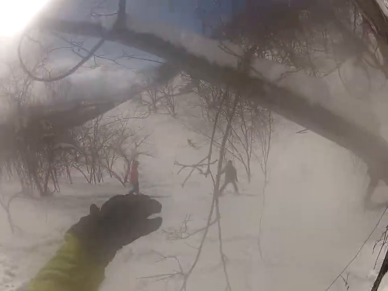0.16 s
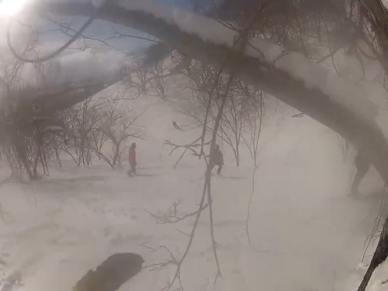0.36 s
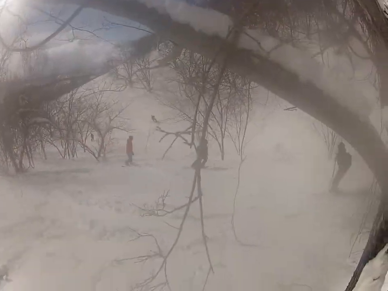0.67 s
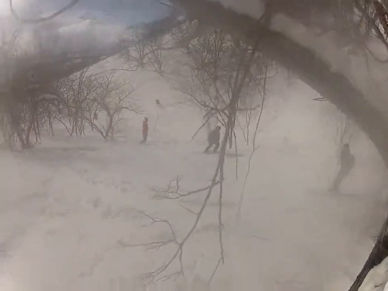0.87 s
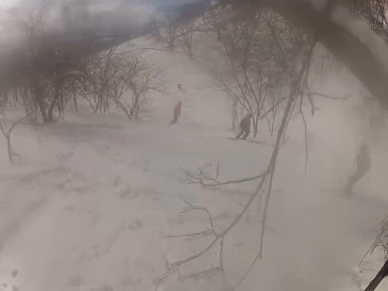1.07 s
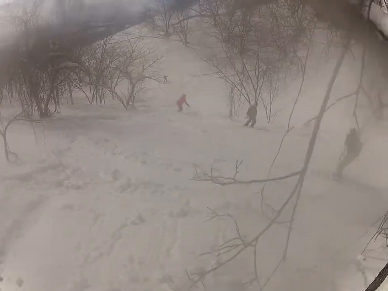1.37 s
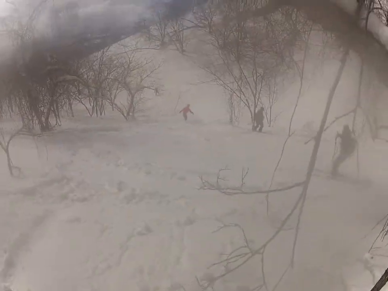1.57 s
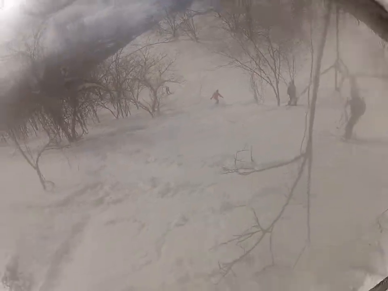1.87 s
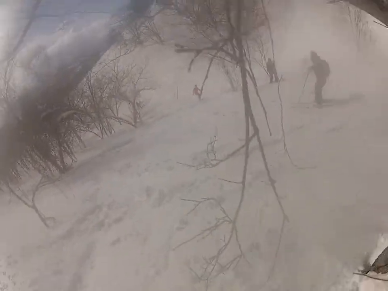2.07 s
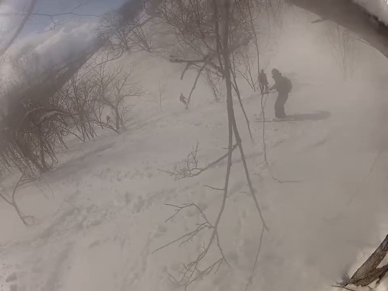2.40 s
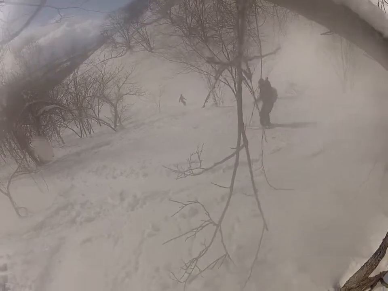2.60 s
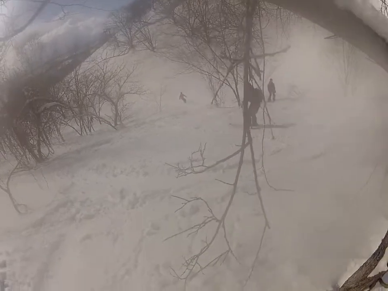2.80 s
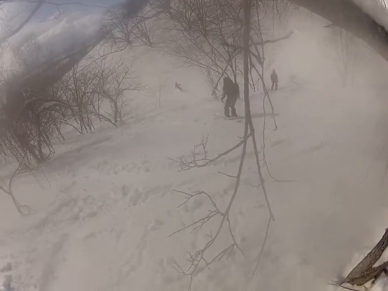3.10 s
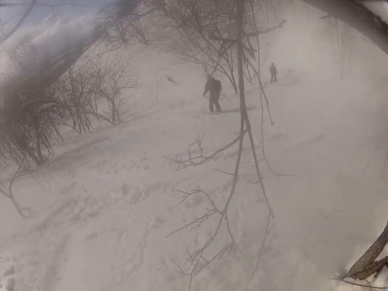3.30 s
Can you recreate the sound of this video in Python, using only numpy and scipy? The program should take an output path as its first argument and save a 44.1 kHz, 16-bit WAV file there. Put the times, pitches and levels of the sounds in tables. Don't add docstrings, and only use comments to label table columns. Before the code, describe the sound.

Sleeve and twigs scrape and knock a camera's plastic case: faint brushes and taps over low wind first, then loud rubbing and clacks after two seconds, heard from inside the closed case on a snowy slope.

```python
import sys
import numpy as np
from scipy import signal
from scipy.fft import rfft, irfft, next_fast_len
from scipy.io import wavfile
from scipy.ndimage import uniform_filter1d

SR = 44100
rng = np.random.default_rng(int(sys.argv[2]) if len(sys.argv) > 2 else 0)


def master(y):
    cut = np.clip(np.atleast_2d(y).T, -1, 1)
    pcm = np.round(cut * 32767)
    wavfile.write(sys.argv[1], SR, pcm.astype(np.int16))


def to_linear_factor(level_db):
    exponent = np.asarray(level_db, float) / 20
    return 10 ** exponent


N = 152145

# f/Hz, density/dB
AIR_SPECTRUM = [(15, -33), (25, 3), (58, -1), (92, -15), (186, -5.5), (239, -9.5), (916, -27.5),
                (2230, -26), (5800, -33), (7540, -75), (12800, -120)]
# centre t/s, peak level/dB, f/Hz, length/cycles
MOUNT_THUMPS = [(.032, -39.5, 70, 0.61), (0.167, -45, 43.7, 1.6), (0.221, -42, 50.4, 2.3),
                (.818, -27.5, 52, 2), (1.385, -43.5, 44, 1.9), (1.81, -49, 59, 0.65),
                (1.849, -41.5, 120, 0.54), (2.03, -46.5, 47, 2.4), (2.159, -18, 184, 2.06),
                (2.17, -20.5, 51.5, 1.5), (2.185, -23.5, 337, 3.1), (2.304, -4, 324, 0.61),
                (2.318, -18, 160, 2.24), (2.372, -16.5, 70, 0.75), (2.485, -18.5, 59.4, 1.97),
                (2.564, -19, 61, 1.67), (2.641, -21, 231, 0.54), (3.02, -32, 182, 1.7),
                (3.037, -3, 140, 0.66), (3.118, -13.5, 162, 0.7), (3.174, -18, 205, 0.6),
                (3.187, -25, 59.6, 1.3), (3.399, -36.5, 31.8, 1.8)]
# f/Hz, width/Hz, level/dB
MOUNT_MODES = [(51, 45, -6.5), (120, 27.7, -4.5), (237, 120, -8)]
# f/Hz, width/Hz, level/dB
CASE_MODES = [(456, 123, -10), (1074.5, 149, 1), (1470, 250, -4), (1812, 226, 1), (2300, 257, 2),
              (2593, 420, -3), (3305, 183, 0), (3580, 170, -8), (4300, 930, -13), (5096, 490, -7.5),
              (5093, 520, -18)]
# t/s, peak level/dB, struck spot f/Hz, contact length/s, spread/Hz
LIGHT_TAPS = [(.009, -38.5, 2000, 0.0024, 500), (.055, -37.5, 2070, .005, 900),
              (.079, -31.5, 1190, 0.0043, 880), (.173, -38, 1500, .002, 4000),
              (.190, -43, 4240, 0.0023, 3000), (.205, -44, 4500, 0.0027, 2500),
              (.217, -43, 2980, 0.0036, 4000), (.424, -43.5, 1040, .004, 400),
              (.425, -39, 4300, 0.002, 2490), (.443, -47, 1040, 0.0044, 300),
              (.4623, -30.5, 2300, 0.0016, 2960), (1.06, -51.5, 3540, 0.0023, 600),
              (1.10, -50.5, 1100, 0.0022, 500), (1.237, -41.5, 3100, 0.0027, 2500),
              (1.635, -52, 1100, 0.0033, 500), (1.668, -50, 2400, 0.0044, 1800),
              (2.061, -41.5, 2200, 0.0028, 1500), (2.073, -43, 2500, .003, 4000),
              (2.096, -30.5, 4080, 0.0028, 5000), (2.133, -46.5, 3000, 0.0044, 4000),
              (2.846, -34, 3820, .0015, 2500), (3.313, -28.5, 2400, 0.0018, 2010),
              (3.345, -32, 2200, 0.0028, 1500), (3.375, -32, 2980, 0.0022, 2500)]
# t/s, peak level/dB, struck spot f/Hz, contact length/s, spread/Hz
HARD_KNOCKS = [(2.171, -7, 2300, 0.0036, 1190), (2.181, 0, 1420, 0.0037, 2000),
               (2.202, -8.5, 2300, 0.0029, 900), (2.2365, -5.5, 2120, 0.0041, 1970),
               (2.302, -4.5, 2300, 0.0025, 1470), (2.316, -7, 2090, 0.0028, 2000),
               (2.331, -5.5, 1180, 0.0045, 1510), (2.363, -4.5, 1800, 0.0034, 1500),
               (2.427, -2, 2400, .005, 1500), (2.441, -15, 3200, .002, 2500),
               (2.571, -17.5, 1970, 0.0028, 1500), (2.6, -13.5, 3050, .002, 3000),
               (2.640, -6.5, 2560, 0.0021, 3470), (2.673, -23.5, 2000, .006, 2000),
               (2.883, -10.5, 2230, 0.0025, 2490), (3.033, 3.5, 1156, 0.0035, 905),
               (3.034, 2.5, 3690, 0.0026, 1200), (3.274, -20.5, 1100, 0.0038, 1500),
               (3.283, -14, 1560, 0.0021, 3000)]
# start t/s, length/s, rub level/dB,
# relative mount shake/dB, brightness/dB
RUB_STROKES = [
    (-.05, 0.2, -54.5, 4, -11.5),
    (0.122, 0.15, -53.5, -0.5, -4),
    (0.23, 0.22, -64, 5, -2.5),
    (0.401, 0.057, -56, -18, -4.5),
    (2.001, 0.065, -55, -13, -5),
    (2.089, 0.032, -54, -20, 10),
    (2.041, 0.14, -55.5, 0, 1.5),
    (2.597, 0.79, -50, 8.5, 6.5),
               (2.143, 0.055, -18.5, -9.5, 3.5), (2.184, .035, -24.5, -5, 3),
                (2.217, 0.061, -53.5, 13, 18), (2.243, 0.13, -29.5, -0.5, 5), (2.295, 0.052, -20.5, 3, 5),
                (2.34, 0.028, -18.5, -17, -1), (2.362, 0.11, -33.5, 9, 14), (2.399, 0.072, -18, -7.5, 3.5),
                (2.449, 0.055, -26, 2, 6), (2.489, 0.092, -39, -4, 3.5), (2.529, 0.071, -27, -7, 4),
                (2.582, 0.11, -37.5, -2.5, 4), (2.64, 0.31, -53.5, -12, 5), (2.809, .16, -39, 9, 3),
                (2.968, 0.09, -39.5, 2, 3), (3.033, 0.075, -49, 10, -13), (3.103, 0.063, -32.5, 10.5, -3),
                (3.166, 0.023, -28, 7, -1.5), (3.19, 0.023, -31, 5, -3), (3.202, 0.16, -45, 6.5, 0.5),
                (3.302, 0.19, -61.5, 6, 6.5)]

AIR_DB = -58
CAVITY_HZ, CAVITY_WIDTH_HZ, CAVITY_DB = 1070, 110, -25.5
PUSH_RISE = 0.2
RING_SAMPLES = 2048
KNOCK_DB = -1
STROKE_ATTACK, STROKE_RELEASE = 0.23, 0.31
GRAINS_PER_S, GRAIN_SPREAD_DB = 7000, 2.0
SLIP_PER_S, SLIP_DB = 150, 1.8
JOLTS_PER_S, JOLT_DB = 40, 4.6
TREBLE_HZ = 2940
FULL_SCALE = 1.0
LIMIT_HZ, HOLD_HZ, TOP_HZ = 5900, 12000, 15450


def unit(x):
    return x / np.sqrt(np.mean(x ** 2))


def band(x, hz, width):
    b, a = signal.iirpeak(hz, hz / width, fs=SR)
    return signal.lfilter(b, a, x)


def body(x, modes):
    ringing = 0
    for k, (hz, width, db) in enumerate(modes):
        ringing = ringing + (-1) ** k * to_linear_factor(db) * band(x, hz, width)
    return ringing


def walk(rate):
    hold = int(SR / rate)
    levels = rng.standard_normal(N // hold + 1)
    x = np.repeat(levels, hold)
    x = uniform_filter1d(uniform_filter1d(x, hold), hold)[:N]
    return x / np.std(x)


def tilt(x, db):
    low = signal.sosfilt(signal.butter(2, TREBLE_HZ, fs=SR, output="sos"), x)
    return low + to_linear_factor(db) * (x - low)


def air():
    noise, gust = 0, walk(2.9)
    spectrum_hz, spectrum_db = np.array(AIR_SPECTRUM).T
    for hz in 28 * 2 ** np.arange(0, 7.8, 0.5):
        windy = 1 / (1 + hz / 320)
        db = np.interp(np.log(hz), np.log(spectrum_hz), spectrum_db)
        db = db + windy * (0.5 * gust + 3.6 * walk(13.4))
        source = rng.standard_normal(N)
        noise = noise + to_linear_factor(db) * band(band(source, hz, hz / 2), hz, hz / 2)
    cavity = unit(band(noise, CAVITY_HZ, CAVITY_WIDTH_HZ))
    return (unit(noise) + to_linear_factor(CAVITY_DB) * cavity) * to_linear_factor(AIR_DB)


def thumps(t):
    out = np.zeros(N)
    for s, db, hz, cycles in MOUNT_THUMPS:
        swell = np.exp(-(2 * hz * (t - s) / cycles) ** 2)
        out += to_linear_factor(db) * np.cos(2 * np.pi * hz * (t - s)) * swell
    return out


def hits(contacts, gain_db):
    out = np.zeros(N)
    t = np.arange(RING_SAMPLES) / SR
    for s, db, hz, length, spread in contacts:
        u = t / length
        push = rng.standard_normal(RING_SAMPLES) * np.minimum(u / PUSH_RISE, 1) * np.exp(-u ** 2)
        local = band(band(push, hz, 1.5 * spread), hz, 1.5 * spread)
        ring = body(local, CASE_MODES)
        i = int(s * SR)
        out[i:i + RING_SAMPLES] += ring * to_linear_factor(db + gain_db) / np.abs(ring).max()
    return out


def stick_slip():
    luck = rng.random((3, N))
    slips = luck[0] < GRAINS_PER_S / SR
    strength = to_linear_factor(-GRAIN_SPREAD_DB * np.log(1 - luck[2]))
    return slips * np.sign(luck[1] - 0.5) * strength * to_linear_factor(SLIP_DB * walk(SLIP_PER_S))


def rub(t):
    strokes = np.array(RUB_STROKES)
    s, length, db, shake_db, bright_db = strokes.T[:, :, None]
    u = (t - s) / length
    ramp = np.clip(np.minimum(u / STROKE_ATTACK, (1 - u) / STROKE_RELEASE), 0, 1)
    power = np.sin(np.pi / 2 * ramp) ** 4 * to_linear_factor(2 * db) + 1e-18
    press = np.sqrt(power.sum(0))
    shake = np.sqrt((power * to_linear_factor(2 * shake_db)).sum(0))
    brightness = (power * bright_db).sum(0) / press ** 2

    grains = stick_slip()
    case = body(grains * press, CASE_MODES) / np.std(body(grains, CASE_MODES))
    jolts = rng.standard_normal(N) * to_linear_factor(JOLT_DB * walk(JOLTS_PER_S))
    mount = body(jolts * shake, MOUNT_MODES) / np.std(body(jolts, MOUNT_MODES))
    return tilt(case, brightness) + band(mount, 100, 250)


def scene():
    t = np.arange(N) / SR
    background = air() + thumps(t)
    contacts = hits(LIGHT_TAPS, 0) + hits(HARD_KNOCKS, KNOCK_DB)
    return (background + contacts + rub(t))[None]


def band_limit(x):
    return signal.sosfilt(signal.butter(12, 16190, fs=SR, output="sos"), x)


def record(dry):
    x = np.clip(dry, -FULL_SCALE, FULL_SCALE)
    x = signal.sosfilt(signal.cheby1(8, 0.5, LIMIT_HZ, fs=SR, output="sos"), x)
    x = x * (1 + 2 * np.cos(2 * np.pi * HOLD_HZ * np.arange(N) / SR))
    size = next_fast_len(N)
    hz = np.arange(size // 2 + 1) * SR / size
    hold = np.sinc(hz / HOLD_HZ)
    top_cut = 1 / (1 + (hz / TOP_HZ) ** 80)
    x = irfft(rfft(x, size) * hold * top_cut, size)[:, :N]
    return band_limit(np.clip(x, -FULL_SCALE, FULL_SCALE))


dry = scene()
out = record(dry)
master(out)
```